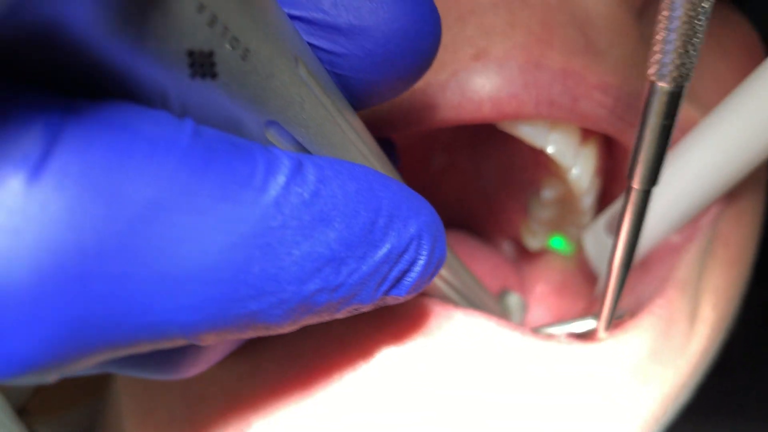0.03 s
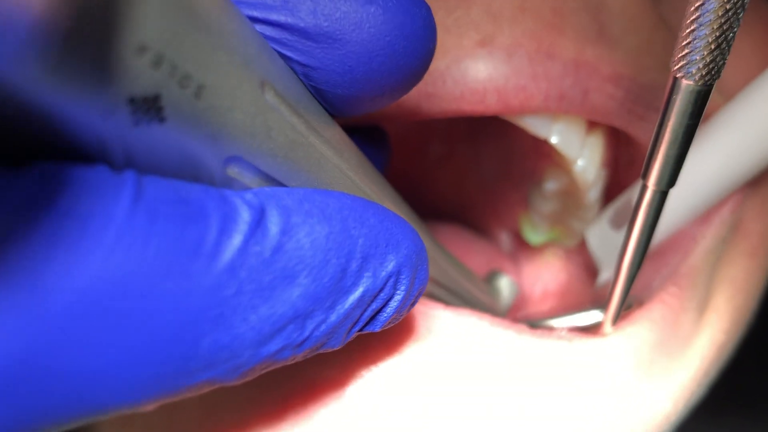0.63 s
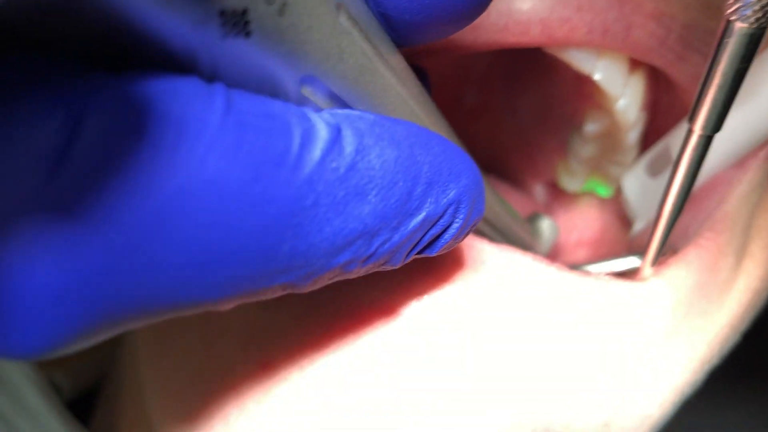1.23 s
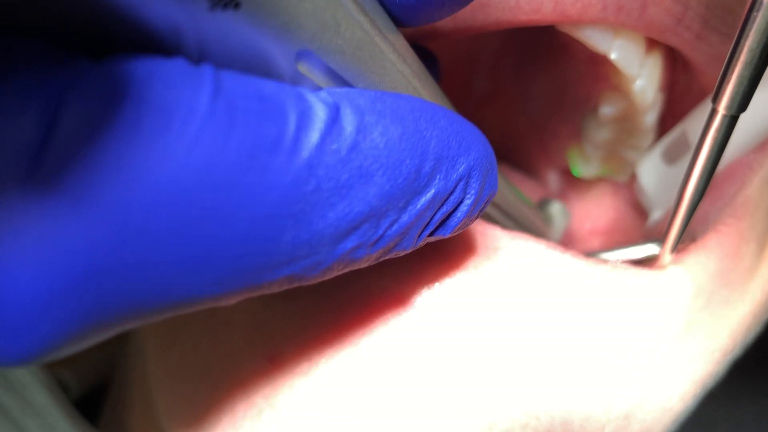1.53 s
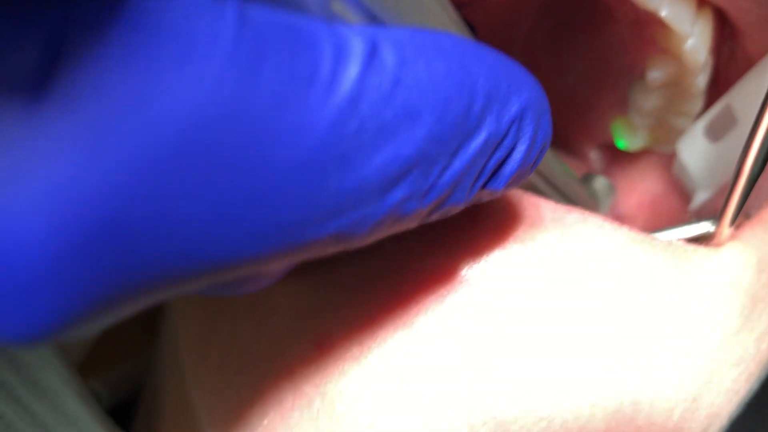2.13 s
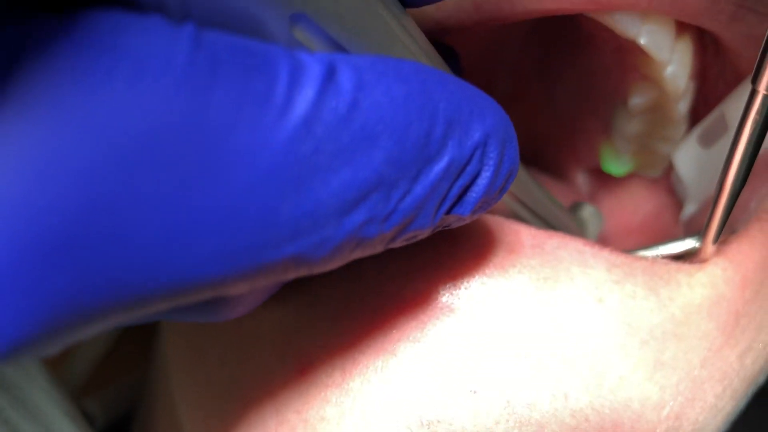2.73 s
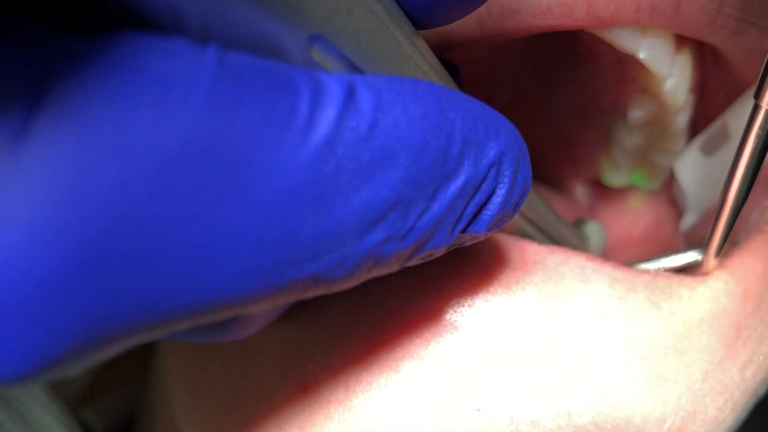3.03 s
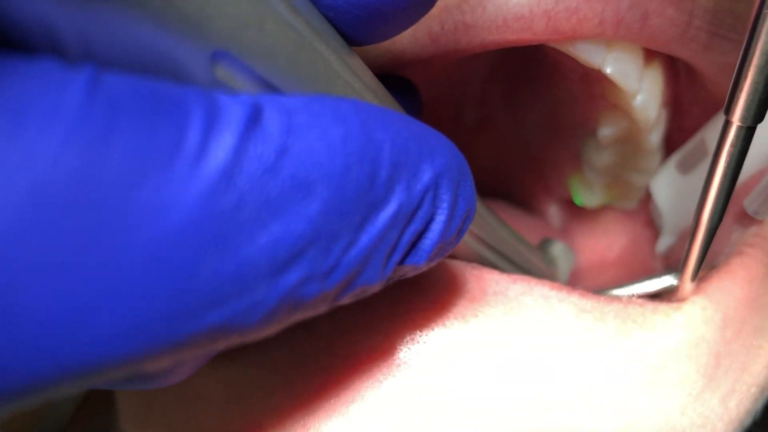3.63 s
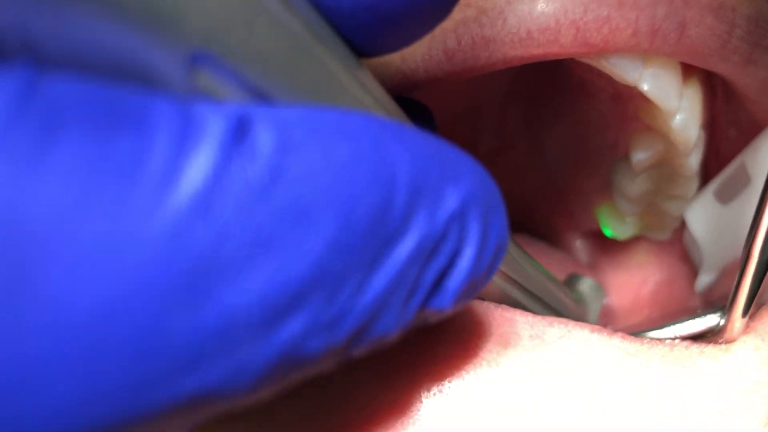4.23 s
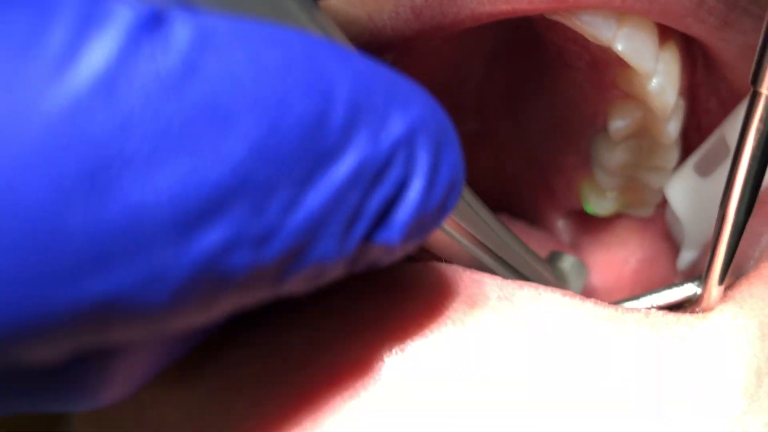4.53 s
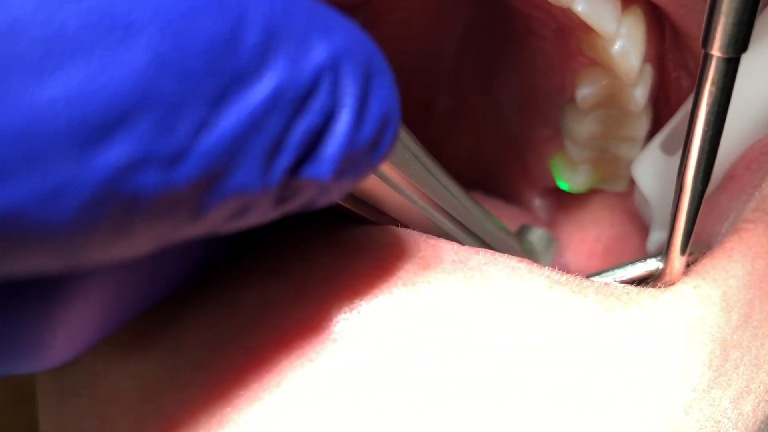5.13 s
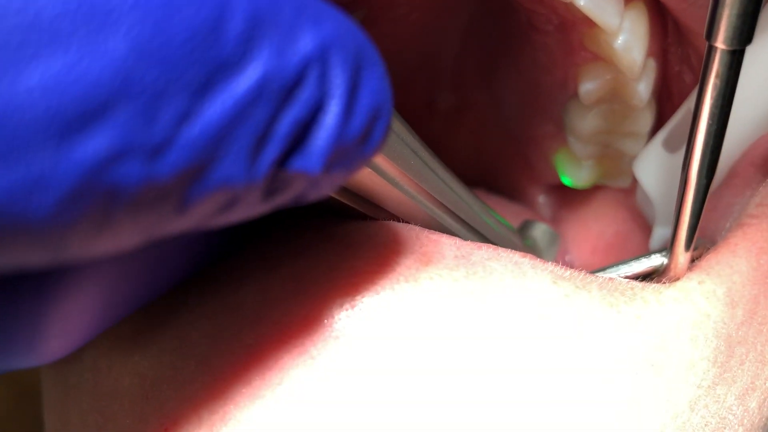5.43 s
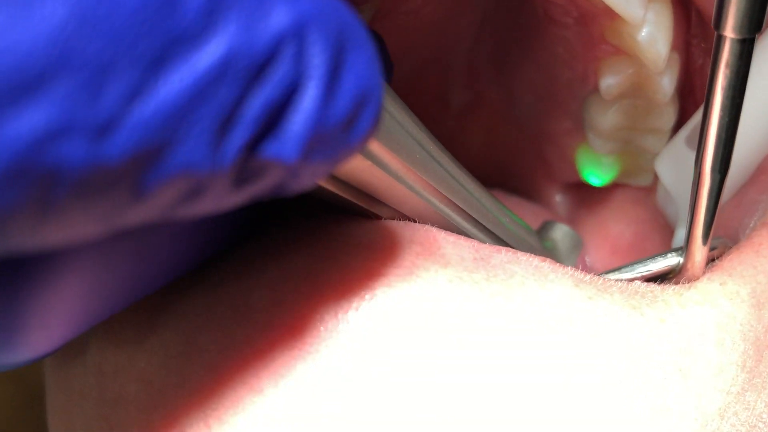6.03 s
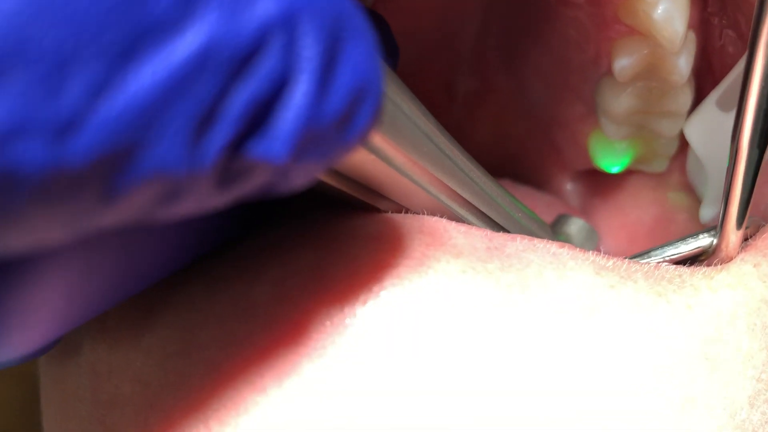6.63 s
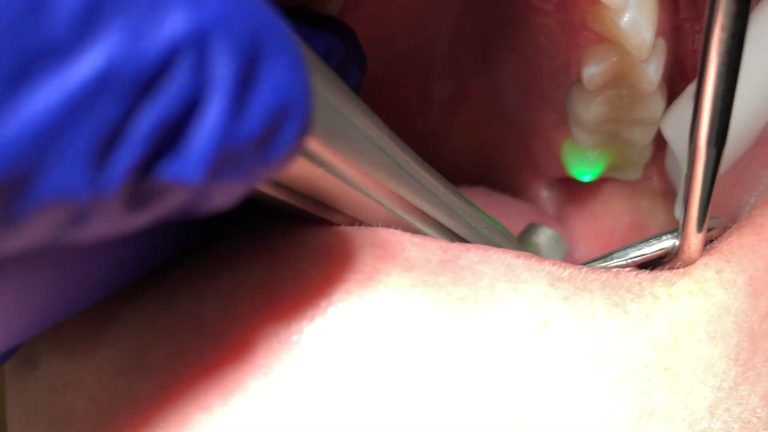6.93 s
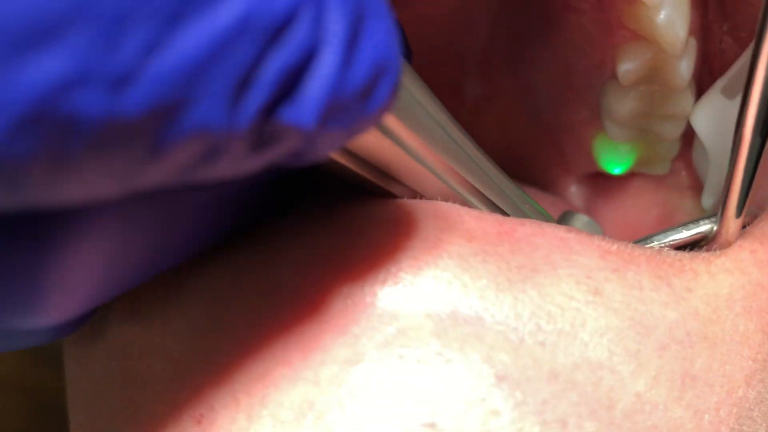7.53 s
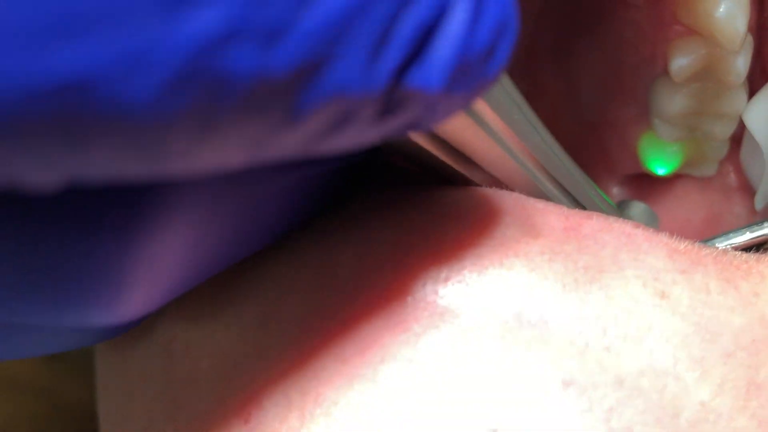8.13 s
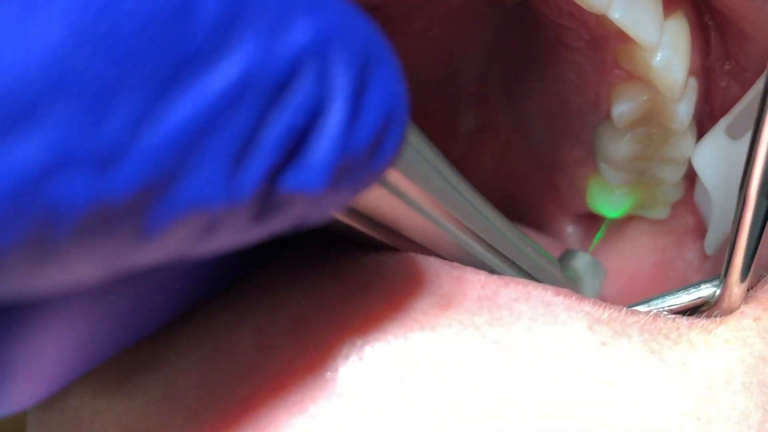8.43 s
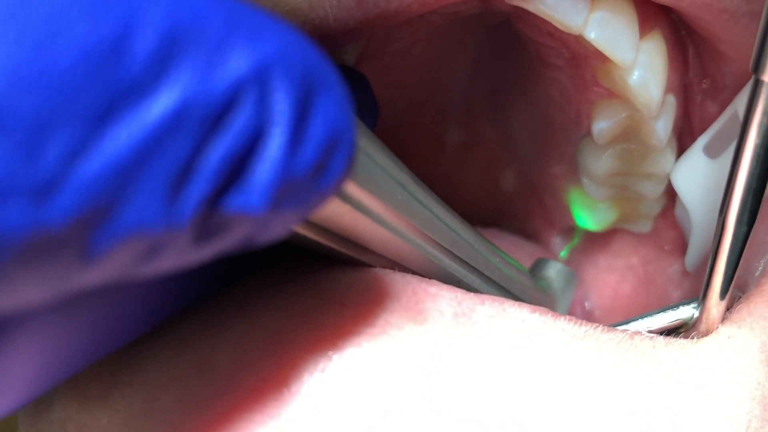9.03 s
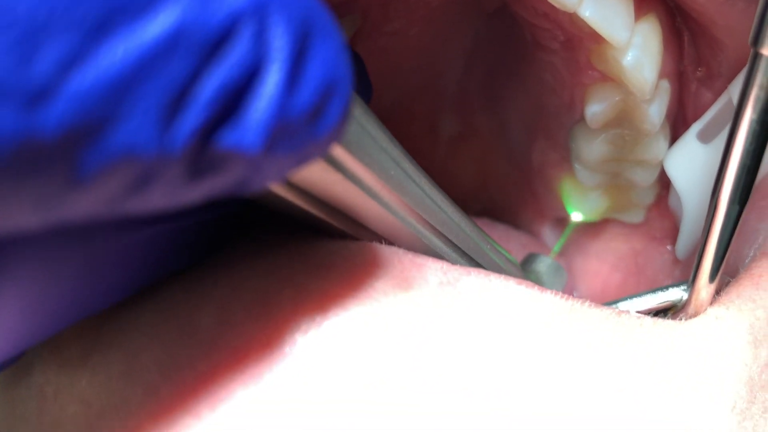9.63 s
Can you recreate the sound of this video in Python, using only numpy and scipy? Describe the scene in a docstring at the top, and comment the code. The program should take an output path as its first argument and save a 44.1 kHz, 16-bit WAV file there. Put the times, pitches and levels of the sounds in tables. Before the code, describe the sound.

A bright, continuous rush of air from a suction tube and a spraying dental handpiece, heard very close, rings slightly in the hollow of an open mouth. Faint droplet ticks and a short spit of water texture the hiss, whose tone slides as the tools move. About three quarters through comes a soft knock of the tube, then two quick spits. The treatment room's ventilation and pump hum low underneath throughout.

```python
"""A dental surgery, one microphone close to an open mouth. A suction tube draws air while a handpiece
sprays air and water on a tooth. The rush rings in the mouth and the tube, and its colour shifts as
the tools move and a gloved hand reflects it. Droplets tick in the spray, water spits at the tip and
the tube gives one soft stumbling knock. Ventilation and a pump hum in the room behind."""
import sys
import numpy as np
from scipy import signal
from scipy.fft import rfft, irfft
from scipy.io import wavfile
from scipy.ndimage import map_coordinates

SR = 44100
rng = np.random.default_rng(int(sys.argv[2]) if len(sys.argv) > 2 else 0)


def waveform_to_disk(signal):
    """Save audio, clipped to [-1, 1], as 16-bit WAV at the path in sys.argv[1]."""
    frames = np.transpose(np.atleast_2d(signal))
    scaled = np.clip(frames, -1, 1) * 32767
    samples = np.round(scaled).astype(np.int16)
    wavfile.write(sys.argv[1], SR, samples)


N = 430857
TIME = np.arange(N) / SR
FREQS = np.maximum(np.arange(N // 2 + 1) * SR / N, 1)


def from_db(db):
    """Decibels to gain."""
    return 10 ** (np.asarray(db) / 20)


def rms_one(x):
    """Scale to rms 1."""
    return x / np.sqrt(np.mean(x ** 2) + 1e-20)


def in_time(rows, at=TIME):
    """Each column of a curve at the given times."""
    times, *columns = np.transpose(rows)
    return [np.interp(at, times, column) for column in columns]


def swells(rows, at=TIME):
    """One smooth rise and fall per event, each with its own length and height."""
    return sum(height * np.exp(-np.minimum((2 * (at - t) / length) ** 2, 20))
               for t, length, height in rows)


def below(edge_hz, order):
    """Gain of a low-pass."""
    return 1 / np.sqrt(1 + (FREQS / edge_hz) ** (2 * order))


def bell(hz, centre, width):
    """Shape of a resonance, 1 on top."""
    return 1 / (1 + (2 * (hz - centre) / width) ** 2)


def colour(slope, resonances=()):
    """Gain of a broad spectrum with bell-shaped peaks and dips on it."""
    hz, db = np.transpose(slope)
    broad_db = np.interp(np.log(FREQS), np.log(hz), db)
    peaks_db = sum(height * bell(FREQS, centre, width) for centre, width, height in resonances)
    return from_db(broad_db + peaks_db)


def filtered(x, gain):
    """Apply a gain given at every frequency."""
    return irfft(rfft(x) * gain, N)


def noise(gain):
    """Noise of the given colour, rms 1."""
    return rms_one(filtered(rng.standard_normal(N), gain))


def drift(rate_hz):
    """Slow random wander, rms 1."""
    return noise(below(rate_hz, order=2))


def machines(rumble_db):
    """Room tone: ventilation and pump rumble in the room's modes, under the pump's wavering tones."""
    # ventilation and pump noise: f/Hz, level/dB
    rumble = [(20, -27), (40, -21.5), (60, -13), (85, -13), (105, -5.3), (180, -5), (240, -0.6),
              (420, -1.5), (520, 1.5), (680, -5.5), (1000, -8.5), (2000, -14)]
    # room resonances: f/Hz, width/Hz, gain/dB
    room_modes = [(70, 12, 4), (116, 18, 6.5), (138, 16, -4), (157.7, 11.4, 10.5), (211, 15, 6.5),
                  (300, 18, -2.5), (330, 31, 4), (495, 12, 4.5)]
    # pump tones: f/Hz, level/dB
    pump_tones = [(119, -67), (565.2, -58)]
    room = from_db(rumble_db) * noise(colour(rumble, room_modes) * below(2200, order=2))
    for hz, level_db in pump_tones:
        amplitude = np.sqrt(2) * from_db(level_db + 1.5 * drift(3))
        room += amplitude * np.sin(2 * np.pi * hz * TIME + .25 * drift(2))
    return room


def tube_knocks(contact_s):
    """Each soft contact of the tube swells briefly and sets the same damped modes ringing."""
    # contacts in one stumble: t/s, level/dB
    contacts = [(7.309, -25.5), (7.334, -30), (7.355, -37)]
    # modes they ring: f/Hz, level/dB, t60/s
    modes = [(482, -10, .12), (538, -10, .22), (585, 1, 0.086), (620, -5.5, 0.16), (720, -12, .1),
             (824, -9, .1), (980, -7, .08), (1350, -1, .1)]
    knocks = np.zeros(N)
    for t, level_db in contacts:
        age = np.maximum(TIME - t, 0)
        attack = np.tanh(age / contact_s) ** 2
        for hz, mode_db, t60 in modes:
            fade = np.exp(-np.log(1000) * np.minimum(age / t60, 10))
            knocks += from_db(level_db + mode_db) * attack * fade * np.sin(2 * np.pi * hz * age)
    return knocks


def deep_rush(centre_hz, width_hz):
    """Suction stirs a weak, low resonance at the back of the mouth."""
    # strength of the low rush: t/s, level/dB
    deep_draw = [(0, -62), (3, -57), (4.3, -50), (6, -48.5), (8, -50), (9.77, -46.5)]
    level_db, = in_time(deep_draw)
    return from_db(level_db) * noise(bell(FREQS, centre_hz, width_hz))


def mouth(width_hz, skirt_hz, flutter_db):
    """The open mouth is a hollow with one broad resonance that moves with the jaw and the tube."""
    # centre of the resonance: t/s, f/Hz
    tuning = [(0, 1220), (.9, 1232), (2.4, 1280), (4.3, 1280), (6.1, 1312), (7.6, 1298), (8.7, 1262),
              (9.77, 1330)]
    # air drawn through the mouth: t/s, level/dB
    air_draw = [(0, -32.5), (1.2, -32.5), (1.5, -33.9), (2.2, -32.3), (2.5, -35), (2.85, -33), (3.8, -32.2),
                (4.8, -33.3), (5.7, -33.5), (6.0, -31.5), (7.0, -32.6), (7.6, -30.9), (8.1, -33.5),
                (9.0, -33.5), (9.77, -32.3)]
    centre_hz, = in_time(tuning)
    level_db, = in_time(air_draw)
    band = below(width_hz / 2, order=1) * below(skirt_hz, order=3)
    phase = 2 * np.pi * np.cumsum(centre_hz) / SR
    hollow = noise(band) * np.cos(phase) + noise(band) * np.sin(phase)  # band moved up to the centre
    return from_db(level_db + flutter_db * drift(12)) * hollow


def spits():
    """A slug of water entering the tip makes the hiss flare for a moment."""
    # slugs of water: t/s, length/s, level/dB
    slugs = [(2.63, .04, -21), (7.765, .045, -20.5), (7.909, .04, -24.5)]
    # colour of a spit: f/Hz, level/dB
    spectrum = [(3000, -24), (4800, -4), (5700, -1), (7000, -2), (8200, -5), (14000, -22)]
    flare = swells([(t, length, from_db(db)) for t, length, db in slugs])
    low_cut = 1 - below(2500, order=3) ** 2
    return flare * noise(colour(spectrum) * low_cut)


def droplets(per_s, spread_db):
    """Random impacts of many small drops and a few large ones, rms 1."""
    sizes = from_db(spread_db * np.minimum(rng.exponential(1, N), 4))
    signs = rng.choice([-1, 1], N)
    hits = rng.random(N) < per_s / SR
    return rms_one(sizes * signs * hits)


def airflow_db():
    """The rush follows a slow course, flutters more as time goes on and dips briefly."""
    # rush at the tips: t/s, level/dB
    course = [(0, -19.2), (.5, -17.4), (1.1, -17.5), (2.1, -19), (2.85, -18.9), (3.5, -17.5), (4.0, -17.5),
              (4.5, -17.1), (5.7, -17.0), (6.0, -16.2), (6.4, -16.7), (6.8, -18.5), (7.85, -16.9),
              (8.3, -17.7), (8.9, -17.9), (9.4, -18.5), (9.77, -17.5)]
    # brief dips: t/s, length/s, gain/dB
    dips = [(3.93, 0.12, -1.1), (7.17, 0.046, -1), (8.16, .07, -1.5), (9.3, .05, -1)]
    slow_db, = in_time(course)
    flutter_db = 0.16 + 0.04 * TIME
    return slow_db + flutter_db * drift(rate_hz=8.5) + swells(dips)


def spray_lift_db(hz, times):
    """Jet and fine mist brighten the hiss as the spray is brought round the tooth."""
    # aim of the spray: t/s, jet gain/dB, mist gain/dB
    aim = [(0, -2, -1.5), (1.3, 0, 1.2), (1.7, -.5, -1.5), (3.1, -0.3, 1.3), (4.2, -.6, 0.5),
           (5.4, -3, -2.8), (6.3, -2.8, -1.8), (6.9, 2.2, 1), (7.9, -.8, 0), (8.5, 1.2, .9), (9.3, 1, 2.7),
           (9.77, 1.6, 1.7)]
    # the jet strikes the tooth squarely: t/s, length/s, gain/dB
    strikes = [(1.1, .5, 1.8), (2.68, .26, 4), (4.95, 0.56, 4.5), (6.57, 0.28, 5.5), (7.45, .3, 2.5)]
    jet_db, mist_db = in_time(aim, times)
    jet_db += swells(strikes, times)
    return jet_db * bell(hz, centre=10350, width=2700) + mist_db * bell(hz, centre=13500, width=2200)


def gap_lift_db(hz, times):
    """The tips and the gaps around them make peaks and dips that slide as the tools move."""
    # gaps between tools, teeth and cheek: t/s, f/Hz, gain/dB
    cheek_gap = [(0.0, 2550.0, 1.5), (1.5, 2500.0, 2.8), (2.5, 2544, 5), (3.7, 2710.0, 7.2), (5.0, 2870, 2),
                 (6.5, 3000.0, 3), (8.0, 3050.0, 4), (9.7, 3410.0, 3)]
    # main resonance of the suction tip: t/s, f/Hz, gain/dB
    suction_ring = [(0, 3800, 11), (.5, 3750, 9), (1.6, 3850, 9.5), (2.35, 3830, 5.8), (3, 3803, 7.5),
                    (3.9, 3700, 8), (4.7, 3780, 10), (5.6, 3790, 9.5), (7, 3730, 10), (8, 3770, 8),
                    (8.7, 3760, 9.5), (9.77, 3756, 9)]
    # gap by the tongue: t/s, f/Hz, gain/dB
    tongue_gap = [(0, 5260, 1.1), (1.8, 4730, 2.5), (2.4, 4730, 8.7), (3.5, 4670, 4.7), (4.3, 5170, 5.1),
                  (5.2, 5170, 1.6), (6.5, 4630, 1), (8, 4500, 4.5), (9.7, 4690, 5)]
    # high ring of the tip: t/s, f/Hz, gain/dB
    tip_ring = [(0.0, 6850.0, 4.3), (0.7, 6760.0, 3.0), (1.8, 6860, 9.1), (2.6, 6880.0, 5.9),
                (4.0, 6800.0, 2.0), (4.7, 6810.0, 6.3), (6.3, 6730, 4.2), (6.8, 6760.0, 1.2),
                (8.0, 6900.0, 3.8), (9.7, 6800.0, 3.8)]
    # gap between spray tip and tooth: t/s, f/Hz, gain/dB
    tooth_gap = [(0, 8100, 3.5), (1.2, 7800, 2), (2.2, 8100, 2.5), (3.2, 7950, 3), (4.5, 7850, 1.5),
                 (5.5, 8050, 2.5), (6.4, 8200, 3.5), (7.6, 8150, 1), (8.6, 8100, 3.5), (9.77, 8100, -1.5)]
    # notch of the tip: t/s, f/Hz, gain/dB
    tip_dip = [(0.0, 9000.0, -2.0), (1.2, 8850.0, -7), (2.1, 8760.0, -2), (3.5, 8800, -2), (5.0, 8760, 1),
               (6.2, 8700.0, 1.2), (6.7, 8710.0, -6), (8.0, 8600, -4.9), (9.7, 8700.0, -5.4)]
    # gap opening and closing beside the mirror: t/s, f/Hz, gain/dB
    mirror_low = [(0, 5600, 1), (1.1, 5650, 3.5), (2.0, 5750, -2), (3.9, 5750, -3), (4.5, 5550, 2),
                  (6.6, 5550, -1), (9.77, 5850, 2.5)]
    # higher peak or dip beside the mirror: t/s, f/Hz, gain/dB
    mirror_high = [(0, 7450, 1.5), (4.3, 7550, 1.8), (4.9, 7450, -3), (6.4, 7480, -2), (7.2, 7600, -0.5),
                   (9.77, 7850, -1)]
    # ring of the nozzle: t/s, f/Hz, gain/dB
    nozzle_ring = [(0, 13570, 3.7), (2, 13640, 2.1), (3.2, 14110, 2.6), (4.2, 13930, 4.3),
                   (5.6, 14120, 8.2), (6.8, 14050, 5.6), (8.5, 13840, 5.8), (9.7, 13820, 2.9)]
    lift_db = 0
    for track, width_hz in [(cheek_gap, 450), (suction_ring, 670), (tongue_gap, 660),
                            (tip_ring, 280), (tooth_gap, 500), (tip_dip, 400),
                            (mirror_low, 300), (mirror_high, 280), (nozzle_ring, 750)]:
        centre_hz, height_db = in_time(track, times)
        lift_db += height_db * bell(hz, centre_hz, width_hz)
    return lift_db


def hiss(drops_db, sputter_db):
    """Turbulence and droplets sound through tube and gaps; water in the stream makes it sputter."""
    # turbulent air: f/Hz, level/dB
    turbulence = [(700, -25.5), (1400, -16.5), (2100, -9.5), (3200, -10), (3600, -1.7), (6500, 3),
                  (9000, 0.65), (12000, -0.76), (15700, -6.6)]
    # steady peaks and dips of the tube: f/Hz, width/Hz, gain/dB
    tube_modes = [(3270, 290, -0.8), (4470, 490, -3.5), (5520, 220, -2.5), (6170, 460, 3.5),
                  (6640, 130, -0.8), (9070, 340, 2.5), (11700, 780, -2.4), (12160, 340, 3),
                  (15520, 540, 5.8)]
    wet_air = rng.standard_normal(N) + from_db(drops_db) * droplets(per_s=1200, spread_db=3.0)
    in_tube = filtered(wet_air, colour(turbulence, tube_modes))
    hz, times, frames = signal.stft(in_tube, SR, nperseg=1024)
    lift_db = spray_lift_db(hz[:, None], times) + gap_lift_db(hz[:, None], times)
    _, in_gaps = signal.istft(frames * from_db(lift_db), SR)
    return in_gaps[:N] * from_db(airflow_db() + sputter_db * drift(30))


def past_hand(rush, strength, sway_ms):
    """Close echoes comb the rush: the hand's inverted one slides as it moves, the others sway."""
    # reflection off the glove: t/s, delay/ms
    hand_delay = [(0, 1.05), (1.0, 1.08), (1.5, 1), (2.4, .895), (3.0, .93), (3.6, .922), (4.7, .832),
                  (6.0, .815), (6.6, .787), (8.4, .765), (9.77, .81)]
    # weak reflections off teeth, lips and mirror: delay/ms, signed gain
    near_echoes = [(1.0, 0.0095), (1.1, -0.012), (1.32, 0.035), (1.47, 0.016), (1.83, -0.04), (2.0, -0.023)]

    def delayed(ms):
        return map_coordinates(rush, [np.arange(N) - ms * SR / 1000], order=3, mode="wrap")

    hand_ms, = in_time(hand_delay)
    echoes = sum(gain * delayed(ms + sway_ms * drift(.6)) for ms, gain in near_echoes)
    return rush - strength * delayed(hand_ms) + echoes


def scene():
    """The mouth up close and the room behind it, on one microphone, alike in both channels."""
    rush = from_db(-0.32) * hiss(drops_db=-12, sputter_db=0.34) + spits()
    hollow = from_db(.5) * mouth(width_hz=250, skirt_hz=426, flutter_db=0.32)
    hollow += deep_rush(centre_hz=660, width_hz=490)
    bass_loss = 1 - below(486, order=2) ** 2  # openings this small radiate little bass
    air = filtered(past_hand(rush, strength=0.12, sway_ms=.014) + hollow, bass_loss)
    mono = air + machines(rumble_db=-47.5) + tube_knocks(contact_s=.003)
    return np.array([mono, mono])


def record(dry):
    """The top treble is cut steeply."""
    return filtered(dry, below(edge_hz=15750, order=400))


dry = scene()
out = record(dry)
waveform_to_disk(out)
```